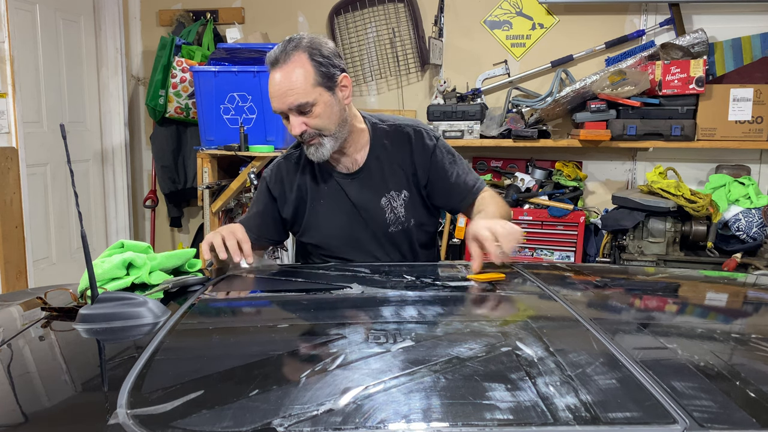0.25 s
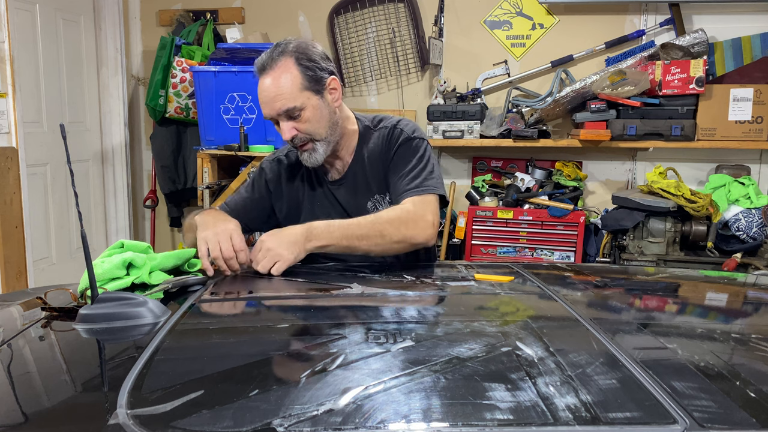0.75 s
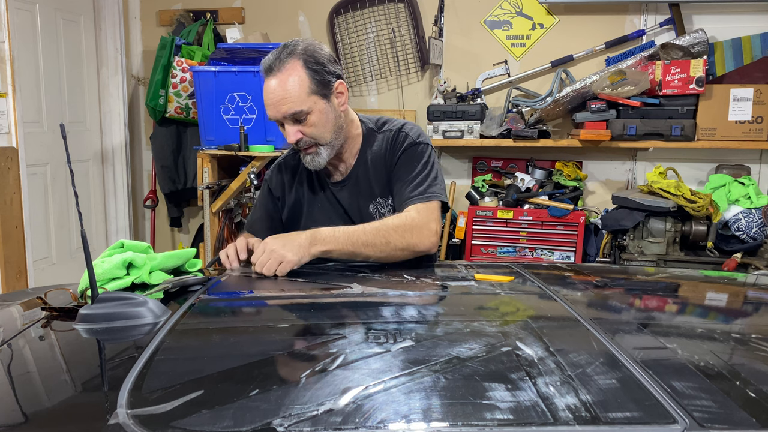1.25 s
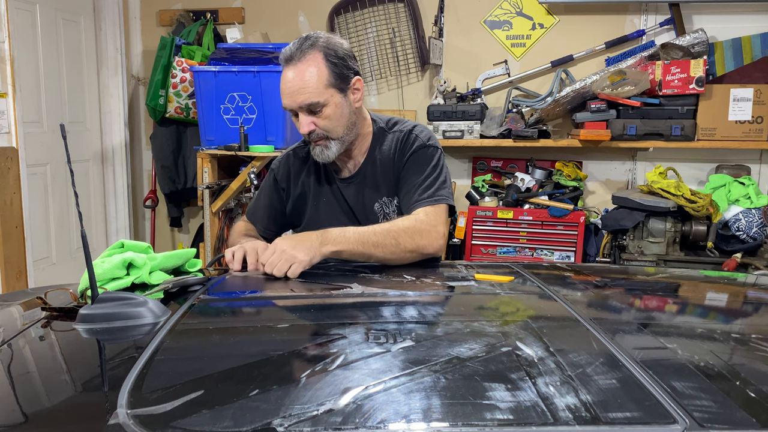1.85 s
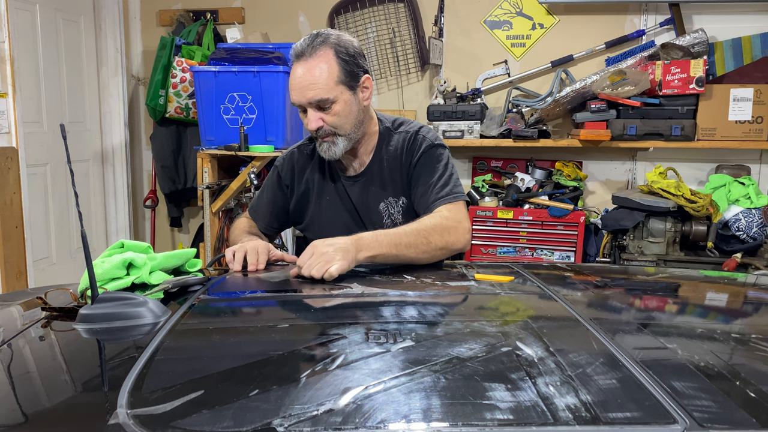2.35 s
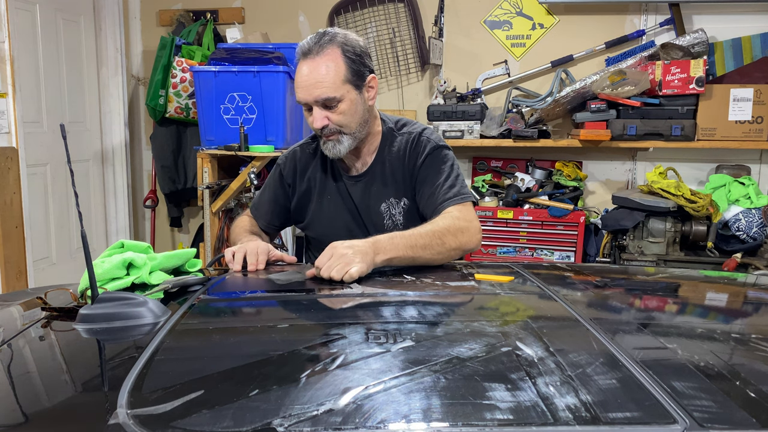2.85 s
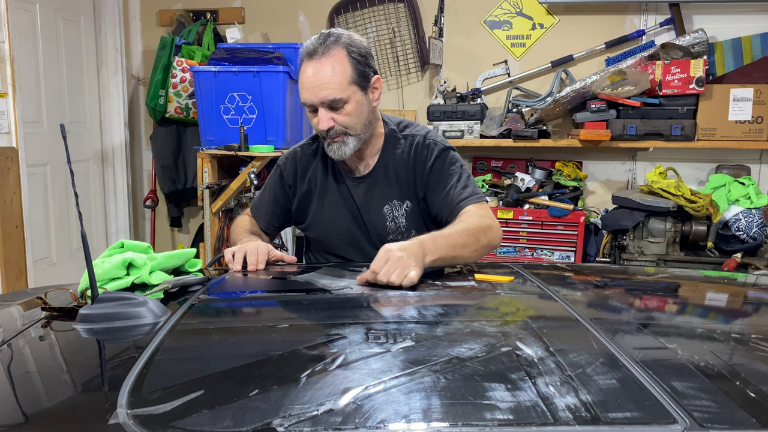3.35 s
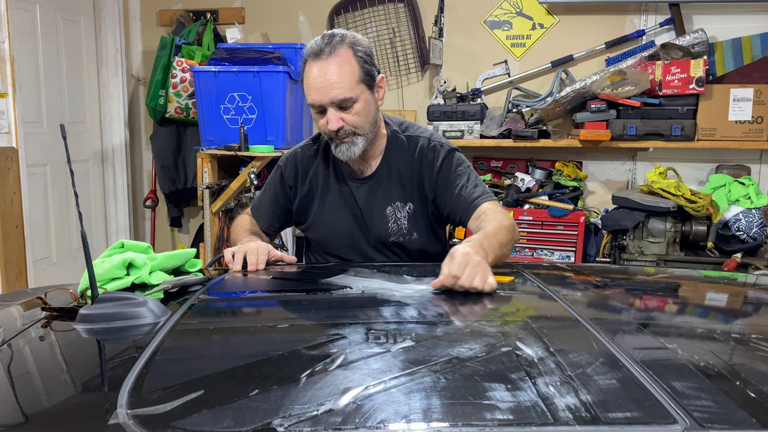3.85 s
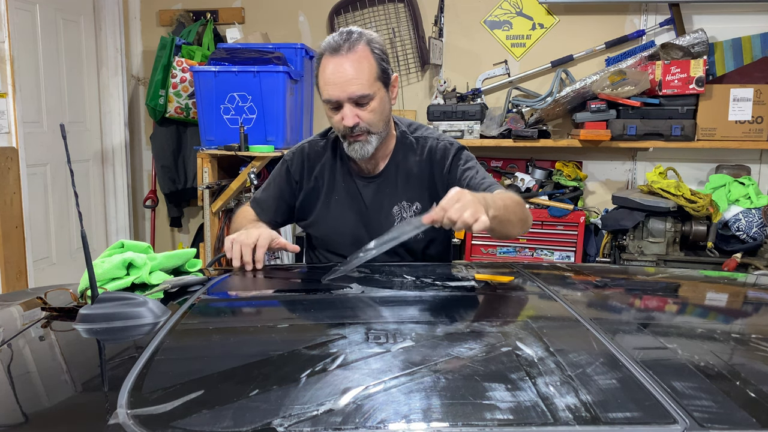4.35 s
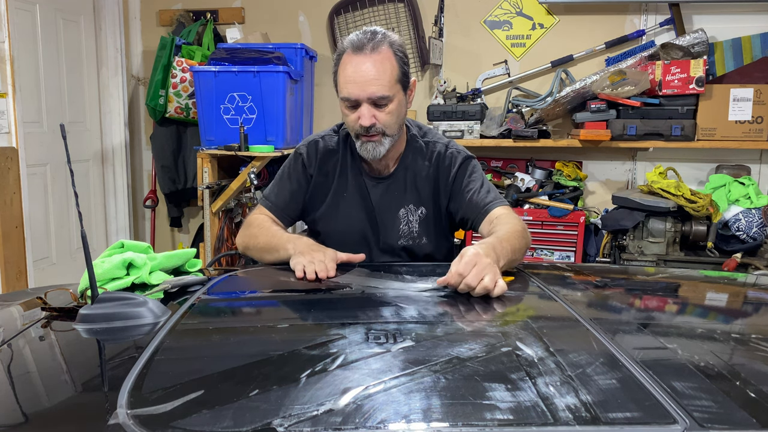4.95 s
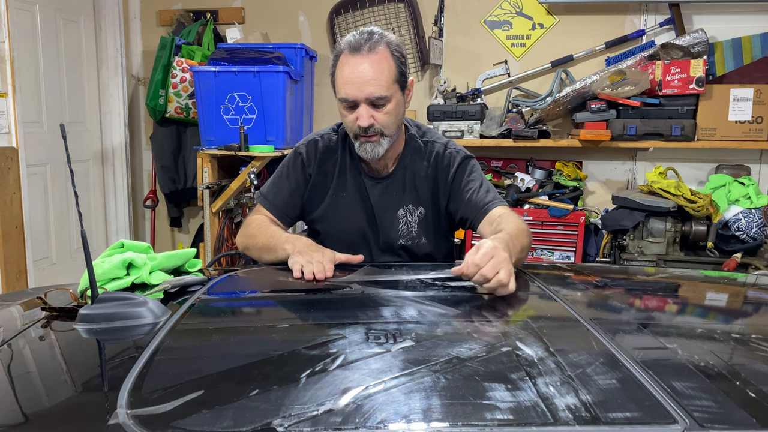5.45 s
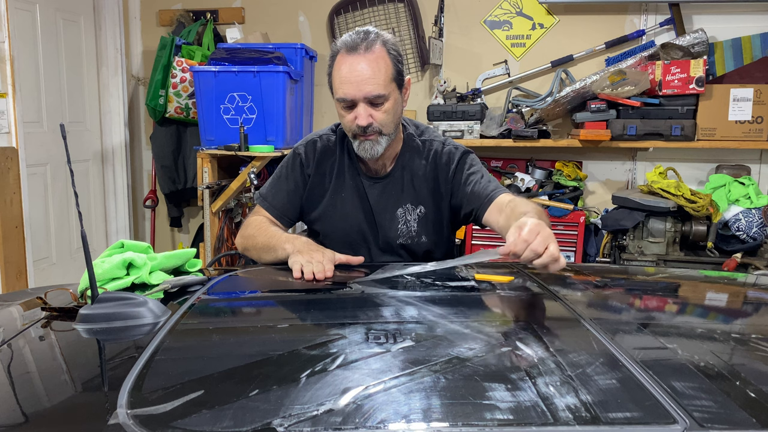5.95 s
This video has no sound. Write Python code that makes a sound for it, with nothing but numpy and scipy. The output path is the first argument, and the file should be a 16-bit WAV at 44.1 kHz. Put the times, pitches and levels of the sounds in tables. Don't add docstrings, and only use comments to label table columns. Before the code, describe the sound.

Sticky film is peeled from a car roof: sharp snaps first, then a jerky tearing rasp, taps, and a second smoother peel.

```python
import sys
import numpy as np
from scipy import signal
from scipy.fft import rfft, irfft
from scipy.io import wavfile
from scipy.ndimage import uniform_filter1d, map_coordinates

SR = 44100
rng = np.random.default_rng(int(sys.argv[2]) if len(sys.argv) > 2 else 0)


def how_loud(loudness_db):
    steps = np.asarray(loudness_db, float) / 20
    return 10 ** steps


def output_pcm(signal):
    pcm = np.clip(np.atleast_2d(signal).T, -1, 1) * 32767
    wavfile.write(sys.argv[1], SR, np.round(pcm).astype(np.int16))


N = 272744
TIME_S = np.arange(N) / SR
SIDES = np.array([[1], [-1]])


def curve(table):
    s, *columns = np.transpose(table)
    return [np.interp(TIME_S, s, column) for column in columns]


def unit(x):
    return x / np.sqrt(np.mean(x ** 2))


def band(x, lo_hz, hi_hz):
    sos = signal.butter(2, [lo_hz, min(hi_hz, 0.45 * SR)], "band", fs=SR, output="sos")
    return signal.sosfilt(sos, x)


def colour(x, points):
    hz, db = np.transpose(points)
    f = np.maximum(np.arange(N // 2 + 1) * SR / N, 1)
    return irfft(rfft(x) * how_loud(np.interp(np.log(f), np.log(hz), db)), N)


def modes(x, table):
    out = 0
    for hz, width_hz, db in table:
        out = out + how_loud(db) * unit(signal.lfilter(*signal.iirpeak(hz, hz / width_hz, SR), x))
    return out


def walk(rate_hz):
    k = int(SR / rate_hz)
    steps = np.repeat(rng.standard_normal(N // k + 1), k)
    return 0.3 * uniform_filter1d(uniform_filter1d(steps, k), k)[:N]


def add(track, s, db, sound):
    at = int(s * SR)
    track[at:at + len(sound)] += how_loud(db) * sound / np.abs(sound).max()


def swells(rows, rise_share, shares_db):
    s, db, fade_s = (column[:, None] for column in np.transpose(rows)[:3])
    t = np.arange(0, N, 32) / SR
    fades_past_peak = np.maximum((s - t) / (rise_share * fade_s), (t - s) / fade_s)
    power = how_loud(2 * (db - 20 * fades_past_peak))
    return [np.interp(TIME_S, t, np.sqrt(how_loud(2 * share) @ power)) for share in shares_db]


def plain_swells(rows, rise_share):
    return swells(rows, rise_share, [np.zeros(len(rows))])[0]


def ranges(steep_db, slack_db):
    low_db = -18.5 + slack_db
    rasp_db = -10 + 0.34 * slack_db - 0.019 * steep_db
    return [low_db, rasp_db, 0 * steep_db, steep_db]


def peel_gains():
    # peak_time_s, peak_db, fade_s, steepness_db, slack_db
    picks = [(0.0, -72, 0.19, -1.5, 15), (0.14, -68.5, 0.055, 1, 23), (0.228, -67.5, 0.4, 1, 5),
             (0.289, -47.5, 0.048, 2, 1), (0.614, -83, 0.17, 15.5, 1), (0.873, -47.5, 0.09, -6, 7.5),
             (0.98, -70, 0.37, 3.5, 8), (1.14, -73, 0.2, 4, 1), (1.259, -60.5, 0.055, -4.5, -6),
             (1.422, -65, 0.15, -4.5, 11.5), (1.57, -70, 0.068, 5.5, 14), (1.61, -64, 0.19, 3, -17),
             (4.1, -69.5, 0.18, 7, 7), (4.219, -68, 0.052, 4, 7), (4.35, -82.5, 0.074, 11, 3),
             (4.738, -69, 0.052, 1, -15), (4.82, -63, 0.064, -21, 5), (4.961, -73.5, 0.18, 5.5, 9.5)]
    # peak_time_s, peak_db, fade_s
    drags = [(.36, -59, 0.075), (2.14, -67, 0.096), (2.35, -57.5, 0.046), (2.9, -53, 0.086),
             (3.07, -53, 0.49), (3.11, -48.5, .08), (3.29, -56, .08), (3.76, -58, .2), (3.88, -49, 0.043),
             (4.58, -60.5, 0.089), (5.62, -55, 0.057), (5.92, -57.5, 0.45)]
    # time_s, pull_db, steepness_db, slack_db
    slow_draw = [(1.8, -77, 4, -2), (1.84, -69, 5, 0), (1.9, -62, 6.5, 0), (2.12, -56, 1.5, 0),
                 (2.3, -52.5, -0.5, 4.5), (2.45, -57, 2, 8.5), (2.52, -57.5, 5.5, 9), (2.73, -55.5, 0.5, 0),
                 (2.95, -49.5, 0.5, 2.5)]
    # time_s, pull_db, steepness_db, slack_db
    jerks = [(3.08, -41.5, 0, 0.5), (3.22, -47.5, -0.5, 5.5), (3.38, -37, -4, -2.5), (3.5, -46.5, 3.5, 4.5),
             (3.61, -41.5, 1, -3.5), (3.72, -44, 3.5, -1), (3.78, -40.5, 1.5, -4), (3.94, -45.5, 4, 3.5),
             (4.09, -79, -31.5, -22)]
    # time_s, pull_db, steepness_db, slack_db
    second_draw = [(5.07, -96, 22, 36), (5.134, -65, 9.1, 1), (5.216, -57, 7.1, -1.5), (5.42, -56, 6.2, 6),
                   (5.54, -49.5, 5.9, 10), (5.69, -44, 5.4, 7), (5.85, -49, 5, 8), (6.02, -49.5, 5.9, 15),
                   (6.19, -50.5, 5, 18)]

    gains = np.array(swells(picks, 0.47, ranges(*np.transpose(picks)[3:])))
    gains[1] += plain_swells(drags, 0.61)
    for strip in slow_draw + jerks, second_draw:
        pull_db, steep_db, slack_db = curve(strip)
        pulling = (TIME_S > strip[0][0]) * (TIME_S < strip[-1][0])
        gains = gains + how_loud(pull_db + ranges(steep_db, slack_db)) * pulling
    return gains


def peel():
    range_hz = [750, 1800, 4300, 8500]
    # frequency_hz, level_db
    film_colour = [(300, -17), (600, -14.5), (2700, 0.5), (3400, -1), (5000, 3), (6500, 1.5), (10500, 0),
                   (16000, -6)]

    hardness_db = 2.96 * np.minimum(rng.exponential(size=N), 7)
    crowding_db = 2.0 * walk(150) + 1.26 * walk(24.62)
    threads = rng.standard_normal(N) * how_loud(hardness_db) * how_loud(crowding_db)
    film = rfft(band(band(colour(threads, film_colour), 440, 19000), 440, 19500))
    log_f = np.log(np.maximum(np.arange(N // 2 + 1) * SR / N, 1))
    out = 0
    for one, gain in zip(np.eye(len(range_hz)), peel_gains()):
        share = np.interp(log_f, np.log(range_hz), one)
        out = out + unit(irfft(film * share, N)) * gain * how_loud(0.27 * walk(12))
    return out


def snaps_and_taps():
    # start_s, peak_db, ring_hz, tick_rel_db, room_share_db
    taps = [(0.014, -45, 3000, -67, -13.5), (0.0924, -48, 2670, 4.5, 10), (0.288, -21.5, 5560, -11, 2),
            (0.5563, -56, 3100, -5, 5.5), (0.67, -74, 5960, -11, -12), (0.718, -60.5, 2650, -13, 3),
            (0.7878, -63.5, 2150, 8, 7), (0.873, -38, 1330, -14, -12), (0.879, -35, 1800, -17, -3),
            (1.136, -68, 1500, -8.5, 11.5), (2.327, -60, 1480, -12, 1), (3.61, -21, 2730, 6, -4),
            (3.6147, -27.5, 2770, -11, -6), (4.134, -56, 2010, -4, -3), (4.175, -55, 1980, 9.5, 4),
            (4.2557, -62, 3900, 4, -10), (4.351, -57, 1460, -17.5, -3), (4.537, -48, 1800, -17, 0),
            (4.5472, -32, 1910, -50, 0.5), (4.55, -39.5, 2980, -30.5, 4), (4.7516, -52, 4200, -14, 6),
            (4.8734, -59.5, 1600, -37, 4)]
    # start_s, peak_db, ring_hz, tick_rel_db, room_share_db
    snaps = [(0.2961, -17.5, 4900, -1.5, -5.5), (0.995, -46, 3000, -3, -3), (0.645, -59.5, 5360, 18.5, -8),
             (0.7485, -58.5, 1840, -1, 6), (0.849, -45, 4120, -2, 6), (0.8705, -32.5, 2060, 13, -19),
             (1.408, -55, 4900, -4, 11.5), (3.3093, -35, 4640, 15, 4), (3.422, -50, 4640, -15, -6.5),
             (3.584, -37.5, 4600, 13.5, -5.5), (3.7688, -24, 4760, 5.5, -16.5),
             (3.9362, -37.5, 3750, 0, 12), (4.7373, -45, 3300, -4.5, -0.5), (4.806, -44, 5160, -17.5, -2)]

    t = np.arange(SR // 40) / SR
    dry, wet = np.zeros((2, N))
    for events, knock_db in (taps, -9), (snaps, -32.5):
        for s, db, hz, tick_db, wet_db in events:
            rattle = rng.standard_normal(len(t))
            release = (t == 0) + 0.06 * rattle * how_loud(-60 * t / 0.008)
            ring = band(band(release, hz / 2.37, hz * 1.26), hz / 2.65, hz * 3.7)
            ring = ring / np.abs(ring).max() + 0.066 * band(release, 920, 18000)
            add(dry, s, db, ring)
            add(wet, s, db + wet_db - 3, band(release, hz / 1.6, hz * 1.25))

            knock = band(release, 430, 1640)
            tick = band((t == 0) + 0.2 * rattle * how_loud(-60 * t / 0.0037), 5400, 10100)
            for part, part_db, aim_db in (knock, knock_db, -1), (tick, tick_db + 4, -6):
                add(dry, s, db + part_db, part)
                add(wet, s, db + part_db + wet_db + aim_db, part)
    return dry, wet


def cracks():
    # start_s, peak_db, centre_hz, spread_factor
    events = [(0.0932, -48, 9750, 0.96), (0.2882, -23.5, 1710, 1.97), (0.2942, -34, 11000, 1),
              (0.2962, -15.5, 4930, 1.17), (0.2963, -26.5, 11840, 1.09), (0.3004, -26, 10500, 1.5),
              (0.555, -55, 700, 1.35), (0.5545, -59, 3300, 1.4), (0.8195, -52, 1000, 2.4),
              (0.8704, -21, 10600, 1.09), (0.8706, -19.5, 6730, 1.24), (0.8704, -28, 4350, 1.1),
              (0.8706, -31, 13800, 0.92), (0.8745, -35, 10800, 1.3), (0.8736, -31.5, 1520, 1.9),
              (0.875, -34.5, 1290, 1.9), (0.8815, -36, 11360, 1.5), (2.3195, -50, 850, 1),
              (2.385, -45, 2200, 1.1), (3.6035, -31, 10500, 1.15), (3.61, -33, 7730, 1.15),
              (3.6145, -32, 10300, 1.4), (3.6165, -39, 754, 1.3), (3.6186, -30, 1500, 1.8),
              (3.621, -34, 5000, 1.25), (4.1025, -52, 2400, 1.17), (4.1338, -45, 1850, 1.35),
              (4.145, -55, 1700, 1.25), (4.1645, -50, 1100, 1.4), (4.175, -48.5, 2040, 1.13),
              (4.188, -55, 1700, 1.44), (4.186, -57, 704, 1.4), (4.2075, -50, 950, 1.24),
              (4.2115, -58.5, 970, 1.3), (4.222, -58, 1100, 1.6), (4.234, -58, 800, 1.4),
              (4.349, -52, 1250, 1.4), (4.355, -59, 451, 1.25), (4.36, -61, 1390, 1.16),
              (4.361, -59, 710, 1.19), (4.175, -44, 11000, 1.2), (4.5465, -30.5, 2300, 1.42),
              (4.5464, -36, 6500, 1.14), (4.5517, -52.5, 2000, 1.8), (4.7382, -54.5, 2000, 1.46),
              (4.7374, -57.5, 1000, 1.34), (4.806, -55, 1850, 1.15)]

    dry, wet = np.zeros((2, N))
    impulse = np.zeros(SR // 40)
    impulse[0] = 1
    for s, db, hz, spread in events:
        spread = max(spread, 1.05)
        crack = band(impulse, hz / spread, hz * spread)
        octaves_up = max(np.log2(hz / 2000), 0)
        add(dry, s, db, crack)
        add(wet, s, db - 6 - 2.5 * octaves_up, crack)
    return dry, wet


def spits():
    # start_s, peak_db, centre_hz, length_s
    events = [(0.0957, -50, 4980, 0.0057), (0.096, -50, 12100, 0.0054), (0.2881, -24, 5430, 0.0032),
              (0.302, -27, 6500, .006), (0.312, -42, 14500, .006), (0.627, -54, 14800, 0.0086),
              (0.632, -52, 10800, .012), (0.64, -57, 10800, 0.013), (0.6445, -47, 15000, .006),
              (0.668, -53.5, 6300, .01), (0.87, -33, 14800, .004), (0.8705, -23, 7360, 0.003),
              (0.881, -44, 6500, .012), (0.852, -53, 7500, 0.0054), (0.874, -39, 10800, .008),
              (0.8745, -38, 10700, .006), (0.884, -42, 10300, 0.0103), (3.311, -42, 11000, .006),
              (3.613, -23, 5300, 0.0087), (3.621, -46, 10500, .006), (4.102, -58, 7500, .005),
              (4.175, -43.5, 6400, 0.0061), (4.187, -48, 6300, .006), (4.255, -59, 7560, 0.007),
              (4.5462, -37, 6000, 0.0038), (4.557, -42, 2270, 0.018), (4.134, -60, 7870, 0.0046),
              (4.206, -56, 6800, .012), (0.552, -60, 11000, .005), (4.554, -48, 6460, 0.0056),
              (4.7376, -56, 12000, 0.0074), (4.7525, -60, 12000, .006), (4.807, -49, 4330, .006)]

    t = np.arange(SR // 40) / SR
    dry, wet = np.zeros((2, N))
    for s, db, hz, length_s in events:
        burst = rng.standard_normal(len(t)) * how_loud(-60 * t / length_s)
        add(dry, s, db, band(burst, hz / 1.13, hz * 1.13))
        add(wet, s, db - 8.5, band(burst, hz / 1.9, hz * 1.3))
    return dry, wet


def scuffs():
    # start_s, peak_db, ring_hz, length_s
    events = [(0.819, -56, 1080, 0.017), (0.8414, -45.5, 1090, 0.01), (0.844, -54, 1700, .02),
              (1.15, -64, 869, 0.067), (1.569, -58.5, 1080, 0.023), (1.827, -60.5, 1530, 0.023),
              (2.119, -52, 1660, 0.05), (2.335, -56, 610, 0.048), (3.613, -43.5, 710, 0.034),
              (4.103, -57, 2340, 0.049), (4.144, -55, 1750, 0.012), (4.161, -55, 1160, 0.015),
              (4.163, -52, 1880, 0.0099), (4.179, -65, 1700, 0.027), (4.197, -58, 1750, 0.017),
              (4.2, -56, 1300, 0.022), (4.203, -54, 900, 0.048), (4.207, -75, 960, 0.026),
              (4.222, -69, 1080, 0.031), (4.353, -57, 945, 0.0092), (4.875, -65.5, 903, 0.026)]

    t = np.arange(SR // 10) / SR
    dry, wet = np.zeros((2, N))
    for s, db, hz, length_s in events:
        drag = rng.standard_normal(len(t)) * how_loud(-60 * t / length_s)
        add(dry, s, db, band(3.2 * (t == 0) + drag, hz / 1.3, hz * 1.05))
        add(wet, s, db - 4, band(5.4 * (t == 0) + drag, hz / 2, hz * 1.19))
    return dry, wet


def spreader():
    # start_s, peak_db, ring_hz, t60_s
    rings = [(0.0922, -42, 3600, 0.014), (0.0952, -46, 3600, 0.012), (0.0922, -41, 6950, 0.012),
             (0.0952, -44, 6900, 0.01), (0.0923, -46, 2500, 0.02), (0.0925, -49, 1050, 0.04),
             (0.117, -53, 1300, 0.03), (0.2957, -23, 3500, 0.008), (0.296, -23, 2350, 0.007)]

    t = np.arange(SR // 40) / SR
    dry, wet = np.zeros((2, N))
    for s, db, hz, t60_s in rings:
        ring = np.sin(2 * np.pi * hz * t) * how_loud(-60 * t / t60_s)
        add(dry, s, db, ring)
        add(wet, s, db - 19, ring)
    return dry, wet


def clicks():
    dry, wet = np.sum([snaps_and_taps(), cracks(), spits(), scuffs(), spreader()], axis=0)
    echo = np.roll(band(dry, 300, 5500), int(0.004 * SR))
    return dry + how_loud(-11) * echo, wet


def roof():
    # centre_hz, width_hz, level_db
    boom_modes = [(55, 3.9, 4.5), (67.3, 2.4, 2), (86, 24, 4)]
    # centre_hz, width_hz, level_db
    drum_modes = [(127.5, 35, -2), (171, 78, -0.5), (198, 45, 1), (277.6, 43, 5.5), (387, 110, 6.5)]
    # centre_hz, width_hz, level_db
    hum_modes = [(128, 40, -11), (203, 25, 1), (237, 40, -5), (280, 20, 2.5), (320, 30, -9)]
    # peak_time_s, boom_db, fade_s, drum_rel_db
    leans = [(0.105, -54.5, 0.13, 4), (0.311, -56.5, 0.18, 10), (0.46, -57, 0.16, -20),
             (0.579, -55.5, 0.32, -15), (0.88, -55.5, 0.3, -10), (1.19, -58, 0.092, -4),
             (1.41, -65, 1, -12.5), (2.0, -62, 1, -21), (2.32, -55, 0.23, -1.5), (2.6, -58.5, 0.41, 3),
             (2.82, -72, 0.24, -9), (3.05, -58.5, 0.87, 4.5), (3.17, -65.5, 0.22, 9.5),
             (3.3, -52, 0.53, -2), (3.49, -46.5, 0.036, -44), (3.61, -60.5, 0.2, 9),
             (3.79, -64.5, 0.34, 9.5), (3.91, -53, 0.3, -2), (4.08, -63, 0.057, -16), (4.22, -61, 0.1, -21),
             (4.37, -59.5, 0.32, -15.5), (4.56, -54.5, 0.17, -12.5), (4.721, -59.5, 0.12, -17.5),
             (4.82, -60.5, 0.22, -28), (4.97, -64.5, 0.56, -28), (5.36, -63, 1, -16),
             (5.542, -70, 0.46, -15), (5.78, -59.5, 0.17, -14), (6.0, -70, 0.45, 11), (6.18, -57, 0.32, -1)]
    # peak_time_s, peak_db, fade_s
    palm_drags = [(3.09, -52, 0.14), (3.2, -51, .15), (3.28, -53.5, 0.2), (3.37, -52, .15),
                  (3.47, -60.5, 0.13), (5.66, -63.5, 0.097), (6.17, -58, .1)]

    drum_db = np.transpose(leans)[3]
    boom_gain, drum_gain = swells(leans, 0.64, [0 * drum_db, drum_db])
    push = rng.standard_normal((5, N))
    boom = unit(modes(push[0], boom_modes)) + 0.36 * SIDES * unit(modes(push[1], boom_modes))
    drum = unit(modes(push[2], drum_modes)) + 0.47 * SIDES * unit(modes(push[3], drum_modes))
    drum = band(band(drum, 72, 400), 60, 420)
    hum = unit(band(band(modes(push[4], hum_modes), 90, 360), 80, 380))
    out = plain_swells(palm_drags, 0.62) * hum
    out = out + (boom_gain + how_loud(-67)) * boom + (drum_gain + how_loud(-79)) * drum
    return out * how_loud(0.72 * SIDES)


def thumps():
    # start_s, peak_db, ring_hz, t60_s
    landings = [(0.09, -51, 74, 0.47), (0.294, -55, 115, 0.27), (0.567, -46.5, 91, 0.22),
                (0.873, -44, 64, 0.12), (1.202, -47, 64.3, 0.6), (2.306, -48.5, 63.5, 0.27),
                (2.6, -47, 55.4, 0.23), (3.481, -76, 67.3, 0.19), (4.361, -48, 101, 0.15),
                (4.797, -40, 57.5, 0.22)]
    # start_s, peak_db, ring_hz, t60_s
    raps = [(0.093, -46, 257, 0.1), (0.088, -52, 210, 0.091), (1.15, -57.5, 350, .12),
            (4.8, -58.5, 180, 0.14), (3.612, -48, 662, .05), (3.612, -45.5, 830, .05),
            (0.296, -39, 202, 0.15), (0.322, -47, 168, 0.15), (0.564, -48.5, 182, 0.14),
            (0.6, -48, 169.5, 0.16), (0.875, -47, 356, 0.049), (1.152, -53.5, 133, 0.057),
            (2.329, -59, 322, 0.22), (3.61, -47, 224, 0.16), (4.351, -51.5, 132, 0.24),
            (4.542, -59, 345, 0.11)]

    out = np.zeros(N)
    t = np.arange(SR // 3) / SR
    for s, db, hz, t60_s in landings + raps:
        onset = 1 - np.exp(-t * hz / 0.19)
        add(out, s, db, np.sin(2 * np.pi * hz * t) * onset * how_loud(-60 * t / max(t60_s, 0.05)))
    return how_loud(0.75 * SIDES) * out


def garage(x):
    # frequency_hz, t60_s
    reverb = [(300, 0.4), (2000, 0.24), (8000, 0.36), (14000, 0.26)]

    reverb_hz, reverb_s = np.transpose(reverb)
    t = np.arange(SR // 2) / SR
    tail = 0
    for hz in 200 * 2 ** np.arange(7):
        t60_s = np.interp(np.log(hz), np.log(reverb_hz), reverb_s)
        octave = band(rng.standard_normal((2, len(t))), hz / np.sqrt(2), hz * np.sqrt(2))
        tail = tail + octave * how_loud(-60 * t / t60_s)
    tail = tail + 0.084 * band(tail[::-1], 100, 7300)
    tail = tail * np.clip(t / 0.0019, 0, 1)
    tail = tail / np.sqrt(np.sum(tail ** 2) / 2)
    return signal.fftconvolve(x[None], tail, axes=1)[:, :N]


def air():
    # frequency_hz, level_db
    air_colour = [(300, 7.5), (1100, -31), (1430, -17), (2570, -7), (6850, -12.5), (9000, -22),
                  (12500, -17), (13300, -70)]
    # peak_time_s, peak_db, fade_s
    motor = [(1.4, -80, 0.68), (4.78, -76, 0.17), (4.86, -79, .12), (4.99, -82, .5), (5.1, -86, 0.18),
             (5.21, -76, 0.38), (5.34, -76, .4)]

    noise = rng.standard_normal((2, N))
    mid, side = (unit(band(colour(one, air_colour), 300, 21000)) for one in noise)
    pitch_hz = 1362 + 12 * walk(7.5)
    whine = np.sin(2 * np.pi * np.cumsum(pitch_hz) / SR) * how_loud(1.5 * walk(18))
    whine = plain_swells(motor, 0.18) * whine
    return how_loud(2.5) * whine + how_loud(-83) * (mid + 2.3 * side * SIDES)


def scene():
    # time_s, right_port_lag_samples, left_over_right_db
    hand_path = [(0, -2.5, -1.5), (.5, 3, 5), (2, 5, 7), (3.5, 4, 3), (4, 0.5, 0.5), (4.6, 2, 3.5),
                 (6.2, 2.5, 2)]

    hiss = peel()
    snap, snap_wet = clicks()
    direct = how_loud(-3) * hiss + snap
    lag, left_db = curve(hand_path)
    later = map_coordinates(direct, [np.arange(N) - lag], order=3)
    ports = np.array([how_loud(0.83 + left_db / 2) * direct, how_loud(1.24 - left_db / 2) * later])

    turn = 2 * np.pi * 2.6 * TIME_S
    room = garage(how_loud(6) * snap_wet)
    for k in range(3):
        room = room + garage(how_loud(-4) * hiss * np.cos(turn + k * np.pi / 3))
    return ports + room + roof() + thumps() + air()


def roll_off(x):
    return signal.sosfilt(signal.butter(12, 16990, fs=SR, output="sos"), x)


def record(dry):
    split_hz, notch_hz, turn_hz = 6880, 8990, 2120
    top_hz, squelch_hz, squelch_db = 15680, 13200, -92.5

    low = signal.sosfiltfilt(signal.butter(4, split_hz, fs=SR, output="sos"), dry)
    treble = dry - low
    low = signal.sosfilt(signal.butter(2, 38.0, "high", fs=SR, output="sos"), low)
    f = np.arange(N // 2 + 1) * SR / N
    phase = -np.pi * (1 + (f - notch_hz) / turn_hz)
    left = irfft(rfft(treble[0]) * np.exp(1j * phase), N)
    both = low + np.array([left, treble[0] + 0.23 * treble[1]])
    both = signal.sosfilt(signal.ellip(10, 0.2, 70, top_hz, fs=SR, output="sos"), both)

    top = signal.sosfiltfilt(signal.butter(8, squelch_hz, "high", fs=SR, output="sos"), both)
    power = uniform_filter1d(np.mean(top ** 2, axis=0), size=1024)
    both = both - top / (1 + (power / how_loud(2 * squelch_db)) ** 2)
    return roll_off(both)


dry = scene()
out = record(dry)
output_pcm(out)
```